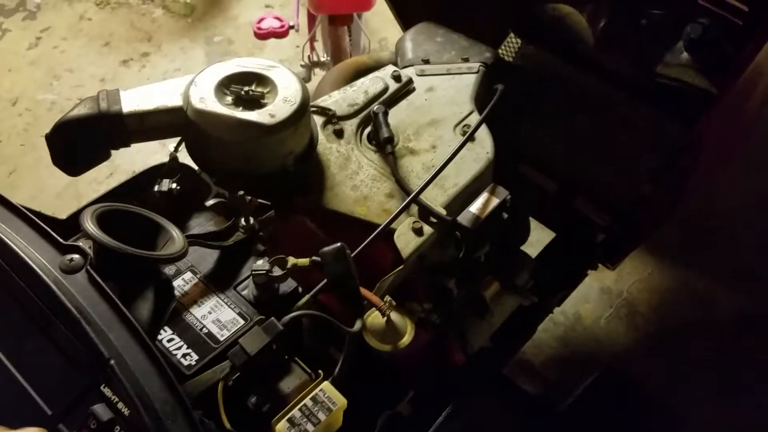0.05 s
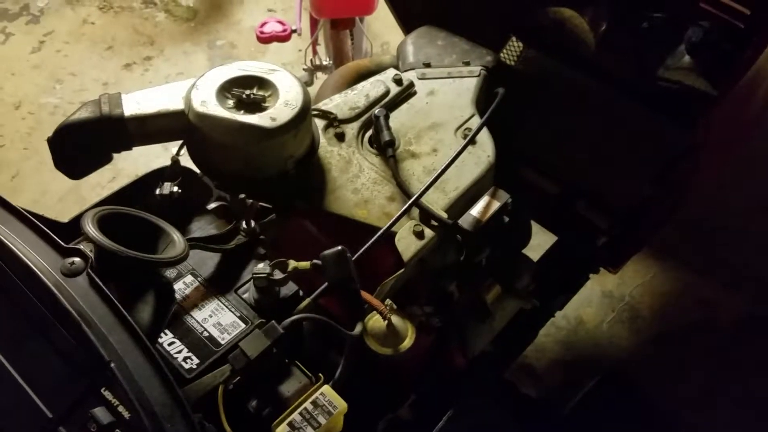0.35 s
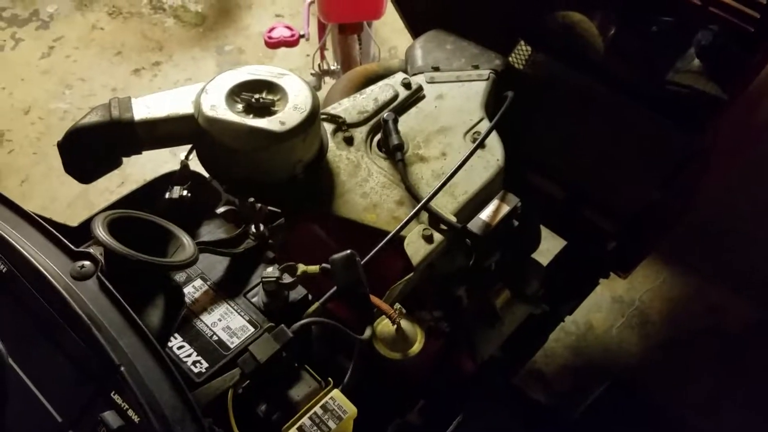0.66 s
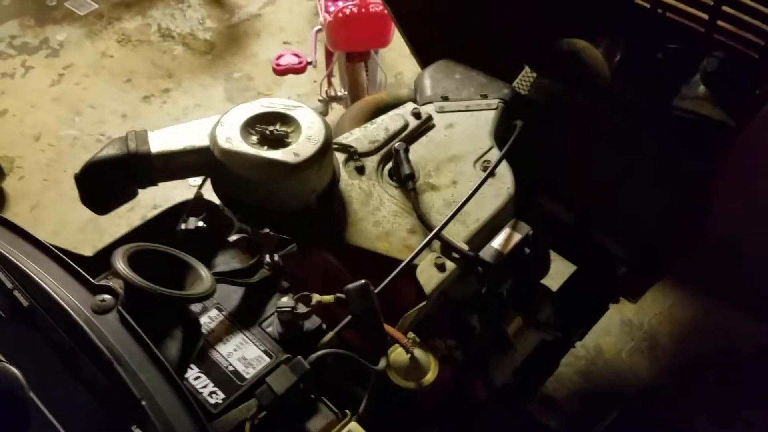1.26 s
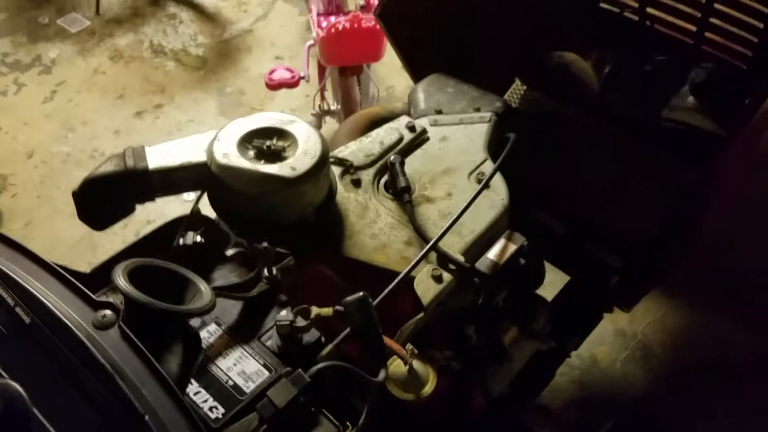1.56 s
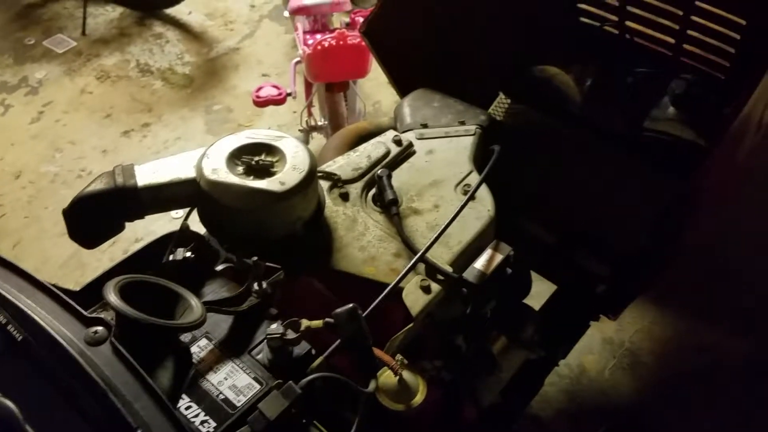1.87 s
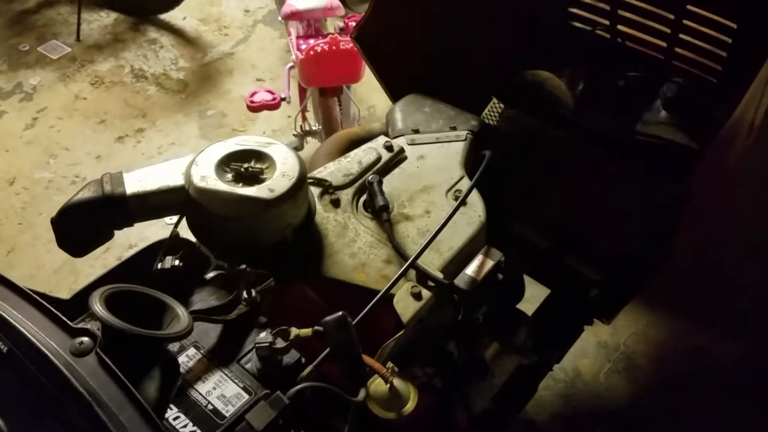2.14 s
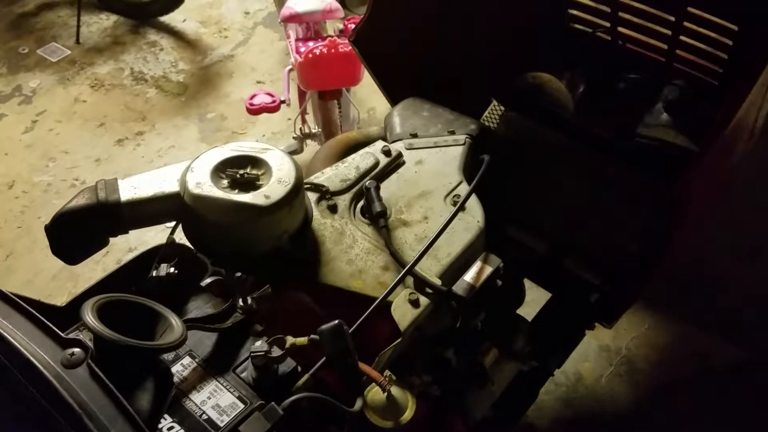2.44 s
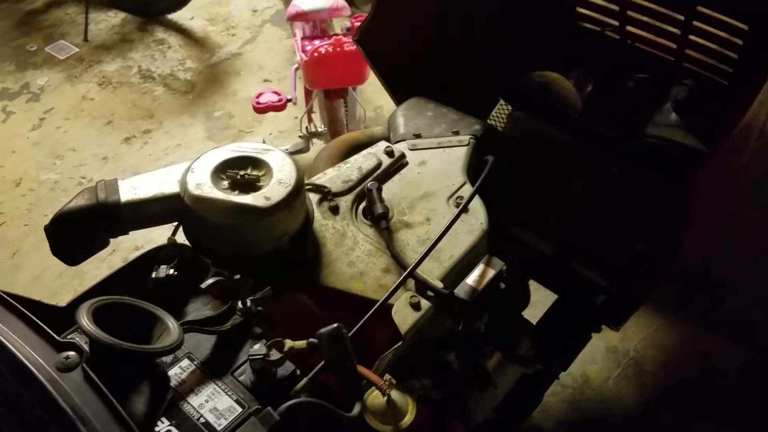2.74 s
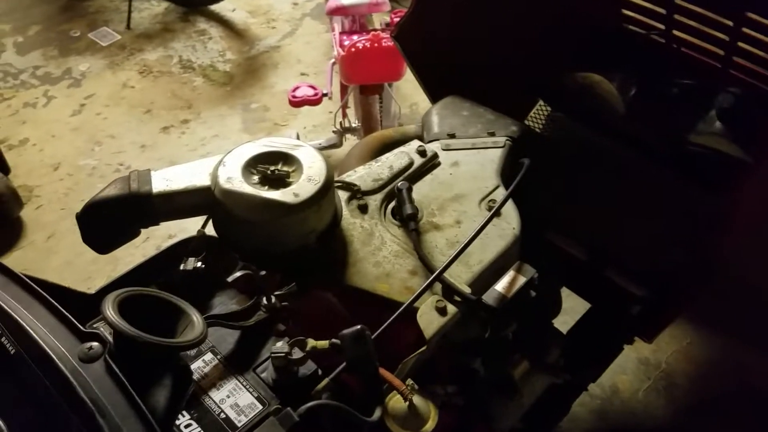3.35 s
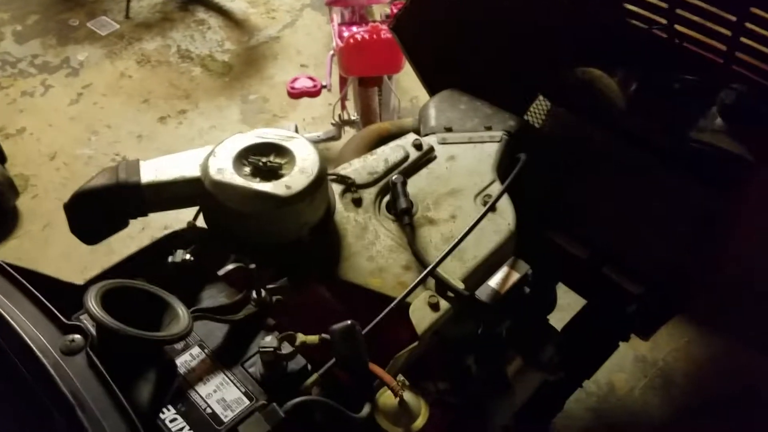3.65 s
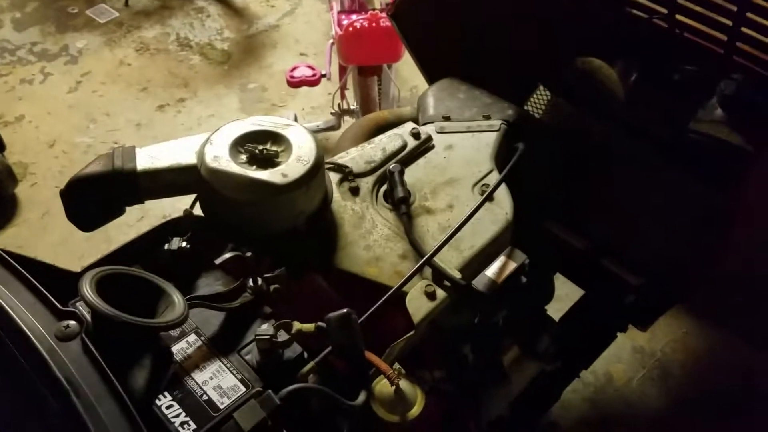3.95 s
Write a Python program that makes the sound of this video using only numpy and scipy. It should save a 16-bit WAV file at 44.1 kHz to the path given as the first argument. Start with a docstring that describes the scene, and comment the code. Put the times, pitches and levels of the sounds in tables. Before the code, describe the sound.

A loud metallic snap rattles a small engine close to the microphone in a quiet garage. A dull clack comes next, then softer taps, ticks and rustling cloth, while an engine outside drones faintly and slows.

```python
"""A metal part snaps home with a bright crack, chatters and rings the casing of a small engine, which is
handled close to a hand-held microphone in a quiet garage. A catch scrapes and drops with a dull clack.
Light knocks, ticks and a cloth rustle follow, over a faint whine and hiss, while an engine somewhere
outside drones and slows down. Hits are clicks and bursts of noise, ringing metal is a set of fading
tones, and the drone is a stack of tones that all follow the engine's speed."""
import sys
import numpy as np
from scipy import signal
from scipy.fft import rfft, irfft
from scipy.io import wavfile
from scipy.ndimage import uniform_filter1d

SR = 44100
rng = np.random.default_rng(int(sys.argv[2]) if len(sys.argv) > 2 else 0)


def transcribe(u):
    """Save the signal u as a 16-bit wav file named by the first command-line argument.

    u: samples, shape (n,) or (channels, n), limited to [-1, 1]; the rate is SR.
    q: integer samples, one column per channel.
    """
    v = np.clip(np.atleast_2d(u).T, -1, 1)
    q = np.round(v * 32767).astype(np.int16)
    wavfile.write(sys.argv[1], SR, q)


N = 176400
T, FREQS = np.arange(N) / SR, np.arange(N // 2 + 1) * SR / N

# Levels are relative: the functions set the final loudness. A fade is the time to die away by 60 dB.
# A colour says how strong a sound is at each pitch.
# blows of the snapping part: start_s, level_db
SNAP_BLOWS = [(0.0229, -4), (0.03, 3.5), (0.0391, 0.5), (0.0417, -7), (0.0588, -14)]
# colours of the blows, their echo and the opening crack: pitch_hz, level_db
SNAP_COLOUR = [(88, -76), (150, -63), (320, -1.5), (481, -17), (781, -12), (912, -7.5), (1290, 2),
               (1800, -4), (1980, 1.5), (3100, -24), (4560, -27), (5440, -39), (7130, -39), (12500, -29),
               (15500, -42)]
SNAP_ECHO_COLOUR = [(200, -39), (345, -10), (400, -16), (560, -12), (607, -8), (680, -21), (780, -10.5),
                    (890, 3.5), (990, -16), (1120, -1), (1300, -6.5), (1420, -6), (1750, -2.5), (1840, -17),
                    (1950, -3), (2300, -7.5), (2450, -12.5), (2900, -16.5), (3200, -23), (4700, -23),
                    (8200, -22), (15500, -36)]
CRACK_COLOUR = [(500, -30), (1500, -14), (2900, 3.5), (4500, 4.5), (5400, -11), (7500, 1), (11000, -9.5),
                (14500, -7), (15800, -8.5)]
# ringing tones of the casing: pitch_hz, level_db, fade_s (before stretching)
CASING_TONES = [(345, -11, 0.46), (598, -8, 0.38), (877, -7, 0.4), (910, -2, 0.38), (931, 0, 0.37),
                (1083, -7, 0.53), (1128, -8, 0.41), (1152, -8, 0.93), (1183, -12, 0.62), (1412, -9, 0.49),
                (1458, -10, 0.39), (1567, -10, 0.42), (1680, -9, 0.42), (1698, -9, 0.42), (1918, -3, 0.4),
                (1946, -8, 0.46), (1969, -6, 0.37), (2038, -2, 0.3), (2093, -8, 0.35), (2307, -9, 0.36)]
# slips of the catch: start_s, level_db, length_s
SLIPS = [(0.4409, -5.5, 0.0042), (0.4472, -3.5, 0.0062), (0.4566, -5, 0.0027)]
# colours of the slips, the clack and its echo: pitch_hz, level_db
SLIP_COLOUR = [(290, -33), (500, -16), (2280, -19), (3180, -8), (4180, -44), (4760, -13.5), (5750, -26),
               (8740, -12.5), (10700, -14.5), (13300, -2.5), (15800, -9.5)]
CLACK_COLOUR = [(76, -34), (130, -13), (346, -23), (1020, -0.5), (1680, -6), (1970, -3), (2560, -19),
                (3010, -3), (4400, -31), (6180, -10.5), (8850, -31), (13200, -25), (15500, -34)]
CLACK_ECHO_COLOUR = [(88, -34), (150, -4), (279, -9.5), (388, 3), (500, -23), (722, -12), (860, -16),
                     (1150, -13.5), (1760, -21), (3100, -20), (3760, -31), (12800, -23), (15500, -43)]
# ringing tones of the lever that drops: pitch_hz, level_db, fade_s (before stretching)
LEVER_TONES = [(234, -10, 0.53), (325, -12, 0.48), (381, 0, 0.22), (455, -14, 0.64), (605, -18, 0.45),
               (704, -12, 0.32), (760, -15, 0.41), (921, -14, 0.4), (989, -13, 0.61), (1113, -12, 0.3)]
# light knocks: start_s, level_db, lowest_hz, highest_hz
KNOCKS = [(0.356, -5.5, 219, 900), (0.539, -5, 154, 690), (0.917, -17, 249.2, 610), (0.957, -2, 225, 3755),
          (1.219, -18, 250, 701.8), (1.34, -11.5, 740, 1571), (1.532, -17, 695, 1700),
          (1.68, -18, 900, 1600), (3.755, -20, 1800, 3620), (3.82, -17.5, 250, 597.5)]
# ticks and scuffs of handling: start_s, level_db, pitch_hz, rise_s
TICKS = [(0.0148, 16.5, 8100, .0003), (0.201, 7.5, 8900, 0.0021), (0.355, 5.5, 7000, 0.0022),
         (0.652, 7, 8950, 0.0085), (0.812, -7, 5930, .001), (0.857, -4, 14000, .001),
         (1.219, 7.5, 7480, 0.0023), (1.329, -6, 14000, .002), (1.449, -3, 5500, .0002),
         (1.49, -13, 13000, .008), (1.53, 5.5, 6600, .0003), (1.6, -8, 7980, .003),
         (2.035, 5.5, 6980, .005), (2.103, -1, 12100, .001), (2.143, 0, 7000, .001),
         (3.12, 2.5, 8500, .006), (3.217, 7, 11000, .003), (3.385, 0, 8985, 0.0066),
         (3.695, 0.5, 11040, 0.0055), (3.755, -7, 12000, .0003), (3.83, 6.5, 7500, 0.0053)]
# colours of the knocks and the cloth: pitch_hz, level_db
KNOCK_COLOUR = [(100, 9), (300, 6.5), (600, -3.5), (1200, 3), (2600, -1.5), (3900, -10), (5000, -19),
                (15000, -24)]
RUSTLE_COLOUR = [(200, -17), (550, 3.5), (1200, -5), (1800, -8.5), (2550, -4), (3500, -14), (4500, -14.5),
                 (8000, -20), (15000, -44)]
# the engine outside and its tones at 5 and 7 times the cycle rate: time_s, rate_hz, fifth_db, seventh_db
ENGINE_RUN = [(0.0, 21, -50, -61), (0.26, 22.7, -45.5, -68), (0.54, 22.7, -42.5, -46.5),
              (0.73, 23.8, -44.5, -56.5), (1.37, 22.2, -42, -48.5), (1.66, 22.2, -50.5, -62.5),
              (1.84, 20.5, -44, -55.5), (2.33, 17.7, -49.5, -44), (2.68, 18.3, -45, -51),
              (3.25, 17.7, -44, -45.5), (3.91, 17.3, -51, -46.5), (4.0, 17.2, -40.5, -44.5)]
# its weaker tones: multiple (of the cycle rate), level_db
ENGINE_WEAK_TONES = [(4, -53.5), (6, -60), (8, -60.5), (9, -61.5), (11, -65), (12, -72), (13, -67.5)]
# steady hum in the building: pitch_hz, level_db
HUM_TONES = [(40, -66), (65, -56.5), (89.5, -53)]
# loudness of the thin whine: time_s, level_db
WHINE_LEVEL = [(0, -69), (1.45, -80), (1.7, -69.5), (2.2, -72), (2.45, -81), (2.9, -69), (3.3, -71.5),
               (3.6, -67.5), (3.88, -65), (3.97, -70)]
# tiny squeaks: peak_s, level_db, half_length_s
SQUEAKS = [(1.68, -70, .02), (1.91, -78, .04)]
# colours of the background rumble, mid-range wash and hiss: pitch_hz, level_db
RUMBLE_COLOUR = [(20, -38), (52, -37), (64, -3), (95, -2), (135, -1), (160, -7), (220, -4.5), (300, -15.5),
                 (500, -30.5), (1000, -48.5)]
WASH_COLOUR = [(200, -1), (500, -2), (850, 2), (1250, 2), (1800, -4.5), (2600, -5), (4000, -19.5),
               (10000, -43)]
HISS_COLOUR = [(210, -37), (350, -0.5), (600, -3), (1100, -3), (2100, -7), (3200, -10), (4800, -17),
               (7000, -19), (10500, -19.5), (12800, -13.5), (15500, -13)]
# loudness of the wash: time_s, level_db
WASH_LEVEL = [(0, 8.5), (0.8, 1), (1.2, 5), (1.68, 2.5), (1.8, -1), (2.3, -6.5), (4, -18.5)]
# how long the garage echoes: pitch_hz, fade_s
GARAGE_FADES = [(200, 0.32), (600, 0.46), (1200, 0.48), (2200, 0.44), (4000, 0.42), (8000, 0.32),
                (14000, 0.25)]
# how alike left and right are, for distant and for close sound: pitch_hz, likeness (0 to 1)
FAR_LIKENESS = [(130, 0.84), (300, 0.64), (640, 0.28), (1400, 0)]
NEAR_LIKENESS = [(300, 0.6), (640, 0.68), (1400, 0.21), (3000, 0.12), (6000, 0.02)]
# how much quieter the shaded right side of the microphone is: pitch_hz, drop_db
RIGHT_SHADOW = [(60, 11), (120, 12), (380, 9.5), (700, 8.5), (1300, 7), (2200, 9.5), (4400, 6),
                (8000, 10.5), (15000, 13.5)]


def snap():
    """The part snaps home with a bright crack, then chatters against the ringing casing."""
    start = SNAP_BLOWS[0][0]
    bursts = sum(amp(db) * fade(s, fade_s=0.034) for s, db in SNAP_BLOWS)
    blows = sum(amp(db) * delay(s) for s, db in SNAP_BLOWS)
    clicks = amp(-7.5) * tint(click(SNAP_COLOUR), blows)
    crack_shape = amp(-16) * fade(start, fade_s=0.023) + amp(-22) * fade(start, fade_s=0.068)
    crack = crack_shape * noise(CRACK_COLOUR)
    chatter = amp(-16.5) * bursts * noise(SNAP_COLOUR, NEAR_LIKENESS)
    casing = amp(-22) * ring(start, CASING_TONES, stretch=1.145)
    echo = amp(-16.5) * garage_echo(start, SNAP_ECHO_COLOUR, rise_s=0.011)
    return chatter + clicks + crack + casing + echo


def catch(clack_s=0.4595):
    """The catch scrapes in short slips, then the lever drops on its stop and rings."""
    slips = sum(amp(db) * (T >= s) * np.exp(-np.maximum(T - s - length_s, 0) / 0.0013)
                for s, db, length_s in SLIPS)
    lean_left = amp([[0], [-2.5]])  # the catch is close to the microphone's left side
    scrape = amp(-16.5) * slips * noise(SLIP_COLOUR) * lean_left
    clack = amp(-14) * tint(click(CLACK_COLOUR), delay(clack_s))
    burst = amp(-27) * fade(clack_s, fade_s=0.069) * noise(CLACK_COLOUR, NEAR_LIKENESS)
    lever = amp(-25.5) * ring(clack_s, LEVER_TONES, stretch=0.71)
    scrape_echo = amp(-31) * garage_echo(SLIPS[1][0], SLIP_COLOUR, rise_s=0.0037)
    clack_echo = amp(-30.5) * garage_echo(clack_s, CLACK_ECHO_COLOUR, rise_s=0.0031)
    return scrape + clack + burst + lever + scrape_echo + clack_echo


def knocks():
    """Soft contacts make deep bumps and lighter taps, each a burst of noise in its own pitch range."""
    body, out = noise(KNOCK_COLOUR, NEAR_LIKENESS), 0
    for s, db, low_hz, high_hz in KNOCKS:
        shape = fade(s, fade_s=0.033) + amp(-8.5) * fade(s, fade_s=0.31, rise_s=0.0055)
        band = signal.butter(3, [low_hz, high_hz], "band", fs=SR, output="sos")
        knock = signal.sosfilt(band, body)
        out = out + amp(db) * shape * knock / knock.std()
    return amp(-32) * out


def ticks():
    """Handling makes tiny bright clicks and slower scuffs, each with a short echo."""
    grit, out = noise([(500, -21), (3000, 5.5), (15000, 10)]), 0
    for s, db, hz, rise_s in TICKS:
        band = signal.iirpeak(hz, Q=1.2, fs=SR)
        touch = fade(s, fade_s=0.022, rise_s=rise_s)
        echo = amp(-5.5) * fade(s, fade_s=0.24, rise_s=0.0046 + rise_s)
        out = out + amp(db) * (touch + echo) * signal.lfilter(*band, grit)
    return amp(-47.5) * out


def rustle(start_s=2.538, end_s=2.97, rise_s=0.11, fall_s=0.032):
    """Cloth slides unevenly, making a short swell of fluttering noise."""
    shape = np.clip(np.minimum((T - start_s) / rise_s, (end_s - T) / fall_s), 0, 1)
    return amp(-54 + 1.7 * wobble(70)) * shape * noise(RUSTLE_COLOUR)


def engine_outside():
    """A slowing engine comes through the walls as low tones at multiples of its cycle rate."""
    times, rate_hz, fifth_db, seventh_db = np.array(ENGINE_RUN).T
    phase = 2 * np.pi * np.cumsum(np.interp(T, times, rate_hz)) / SR
    strong_tones = [(5, np.interp(T, times, fifth_db)), (7, np.interp(T, times, seventh_db))]
    out = 0
    for multiple, db in strong_tones + ENGINE_WEAK_TONES:
        level = amp(db + 0.8 * wobble(3.2))
        drift = rng.uniform(0, 2 * np.pi) + 0.073 * wobble(3.2)
        out = out + level * np.sin(multiple * phase + drift)
    return amp(4.5) * out


def hum():
    """The building hums with deep tones that waver a little."""
    return amp(4) * sum(amp(db + 1.75 * wobble(4.36)) * np.sin(2 * np.pi * hz * T + 0.13 * wobble(3.9))
                        for hz, db in HUM_TONES)


def whine(pitch_hz=3317):
    """One thin, high tone wavers as it comes and goes."""
    level = amp(over_time(WHINE_LEVEL) + 1.05 * wobble(20))
    return level * np.sin(2 * np.pi * pitch_hz * T + 0.49 * wobble(40))


def squeaks(pitch_hz=8400, spread_hz=700):
    """Tiny rough squeaks: brief swells of noise around one high pitch."""
    swells = sum(amp(db) * np.exp(-((T - s) / half_length_s) ** 2) for s, db, half_length_s in SQUEAKS)
    return swells * noise([(pitch_hz - spread_hz, -40), (pitch_hz, 0), (pitch_hz + spread_hz, -40)])


def background():
    """A low rumble, a soft hiss and a faint mid-range wash that dies down."""
    wash = amp(-59.5 + over_time(WASH_LEVEL) + 0.27 * wobble(4.7)) * noise(WASH_COLOUR)
    rumble = amp(-49) * noise(RUMBLE_COLOUR)
    hiss = amp(-55.5 + 0.13 * wobble(12)) * noise(HISS_COLOUR)
    return rumble + hiss + wash


def garage_echo(start, colour, rise_s):
    """Sound bounces around the garage and blurs into noise; each pitch range dies at its own rate."""
    spectrum, out = rfft(noise(colour, NEAR_LIKENESS)), 0
    for band_hz, fade_s in GARAGE_FADES:
        band = over_pitch([(hz, hz == band_hz) for hz, _ in GARAGE_FADES])
        out = out + irfft(spectrum * band, N) * fade(start, fade_s, rise_s)
    return out


def ring(start, tones, stretch):
    """Struck metal rings with fading tones, out of step left and right; stretch scales their fades."""
    age, out = T[:SR], np.zeros((2, 2 * N))
    at = int(start * SR)
    for (hz, db, fade_s), (phase, side) in zip(tones, rng.uniform(-np.pi, np.pi, (len(tones), 2))):
        gap = np.arccos(over_pitch(NEAR_LIKENESS, hz))  # less alike means further out of step
        lag = np.array([[0], [np.sign(side) * gap]])
        decay = np.exp(-np.log(1000) * age / (fade_s * stretch))
        out[:, at:at + SR] += amp(db) * np.sin(2 * np.pi * hz * age + phase + lag) * decay
    onset = np.clip((T - start) / 0.0042, 0, 1)
    return out[:, :N] * onset


def click(colour):
    """One hard contact: a click of the given colour, peaking at 1."""
    cepstrum = irfft(np.log(amp(over_pitch(colour))), N)
    first_half = (T > 0) & (np.arange(N) < N // 2)  # keeping only this gives the click a sudden start
    pulse = irfft(np.exp(rfft(2 * cepstrum * first_half)), N)
    return pulse / abs(pulse).max()


def noise(colour, likeness=FAR_LIKENESS):
    """Coloured noise of level 1, with left and right most alike in the bass."""
    left, other = rfft(rng.standard_normal((2, N)))
    alike = over_pitch(likeness)
    right = alike * left + np.sqrt(1 - alike ** 2) * other
    pair = irfft(np.array([left, right]) * amp(over_pitch(colour)), N)
    return pair / pair.std()


def fade(start, fade_s, rise_s=0.00015):
    """The loudness of a hit: it rises quickly, then dies away."""
    age = np.maximum(T - start, 0)
    return (1 - np.exp(-age / rise_s)) * np.exp(-np.log(1000) * age / fade_s)


def wobble(rate_hz):
    """A smooth random wander with a spread of 1."""
    hold = int(SR / rate_hz)
    steps = np.repeat(rng.standard_normal(N // hold + 1), hold)
    smooth = uniform_filter1d(steps, hold)[:N]
    return smooth / smooth.std()


def amp(db):
    """Turn decibels into a gain to multiply by."""
    return 10 ** (np.asarray(db) / 20)


def over_pitch(table, hz=FREQS):
    """Read between a table's pitches, with octaves evenly spaced."""
    pitches, values = np.array(table, float).T
    return np.interp(np.log(np.maximum(hz, 1)), np.log(pitches), values)


def over_time(table):
    """Read between a table's times."""
    return np.interp(T, *np.array(table).T)


def tint(sound, gain):
    """Filter a sound with one gain for each pitch."""
    return irfft(rfft(sound) * gain, N)


def delay(seconds):
    """The gains that make tint() move a sound later."""
    return np.exp(-2j * np.pi * FREQS * seconds)


def scene():
    """Add all the sources, then shade the right side."""
    handling = snap() + catch() + knocks() + ticks() + rustle()
    left, right = handling + engine_outside() + hum() + whine() + squeaks() + background()
    return np.array([left, tint(right, amp(-over_pitch(RIGHT_SHADOW)))])


def record(dry):
    """The recorder cuts the highest treble."""
    top_hz = 15900
    return signal.sosfilt(signal.ellip(10, .2, 80, top_hz, fs=SR, output="sos"), dry)


dry = scene()
out = record(dry)
transcribe(out)
```